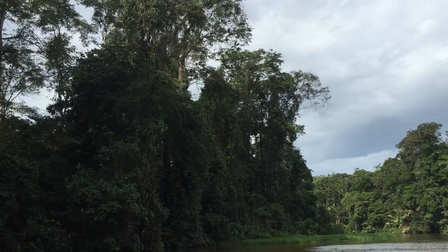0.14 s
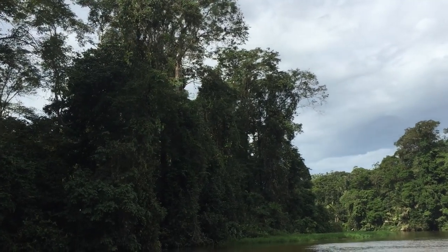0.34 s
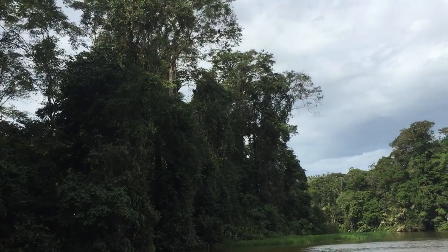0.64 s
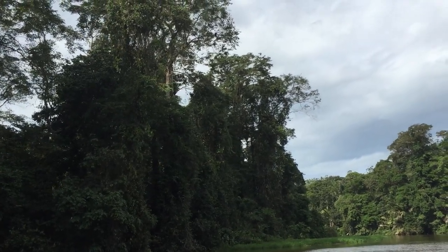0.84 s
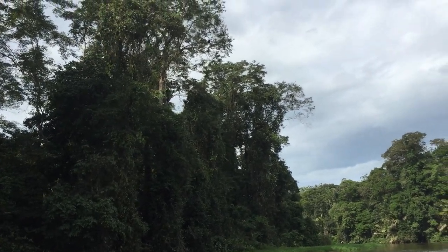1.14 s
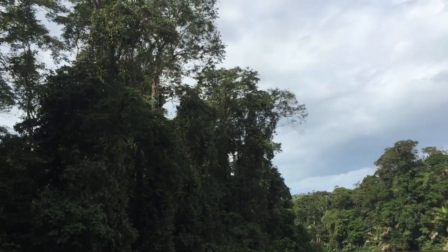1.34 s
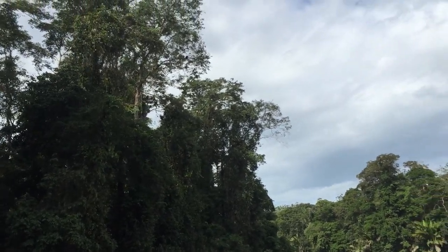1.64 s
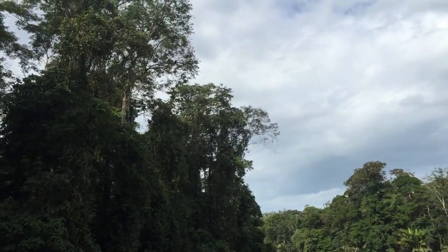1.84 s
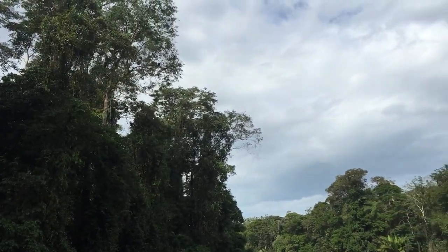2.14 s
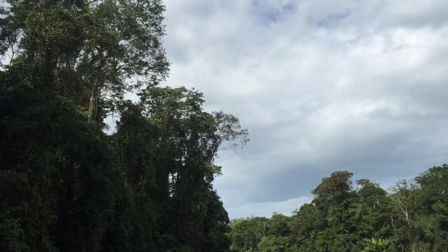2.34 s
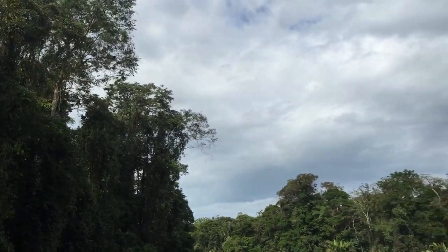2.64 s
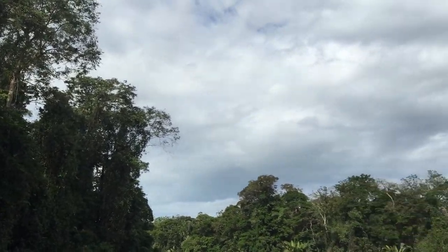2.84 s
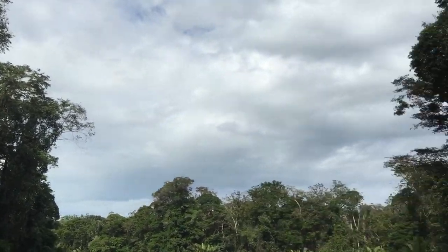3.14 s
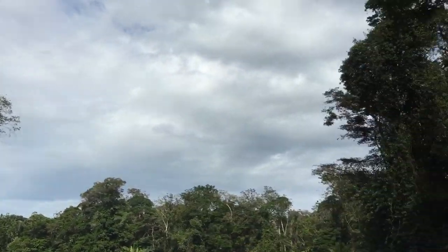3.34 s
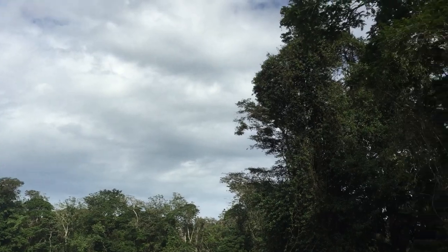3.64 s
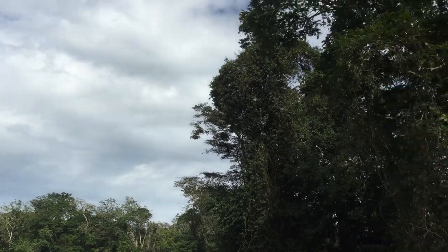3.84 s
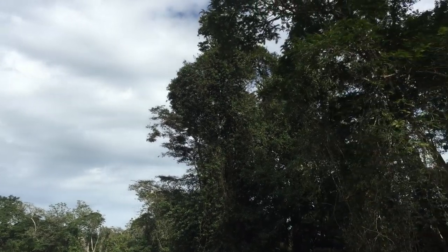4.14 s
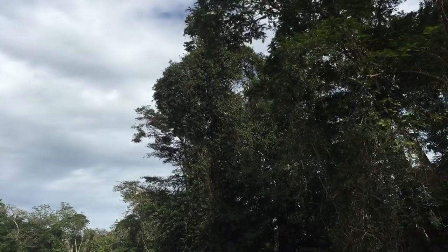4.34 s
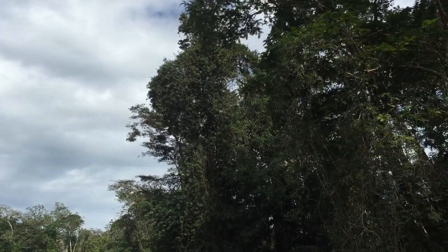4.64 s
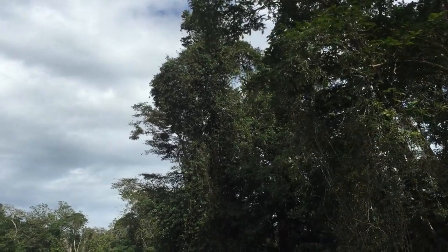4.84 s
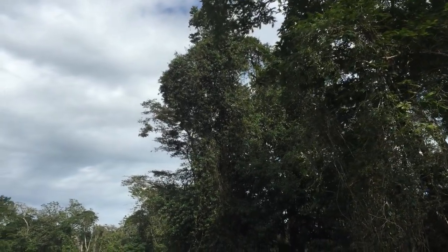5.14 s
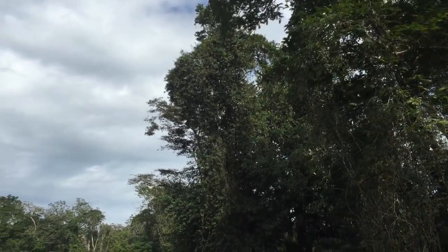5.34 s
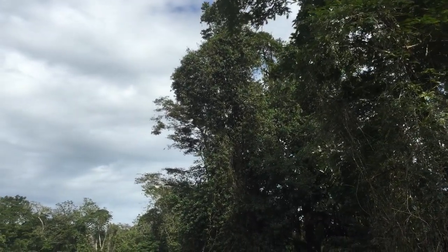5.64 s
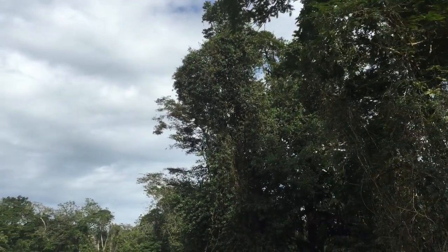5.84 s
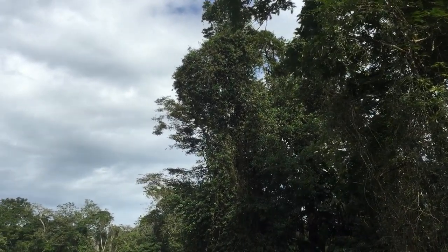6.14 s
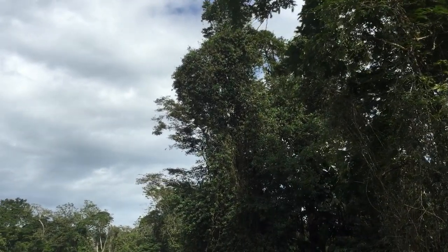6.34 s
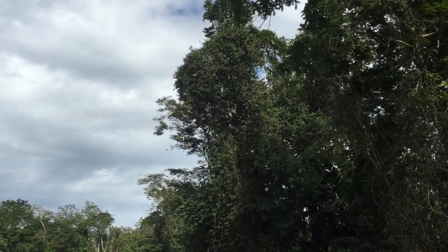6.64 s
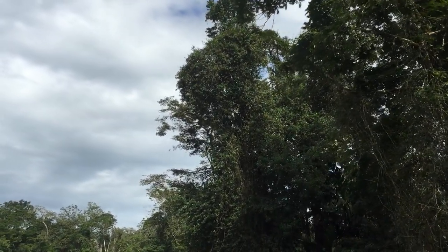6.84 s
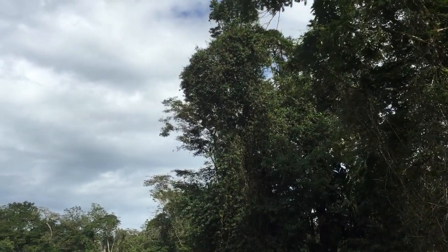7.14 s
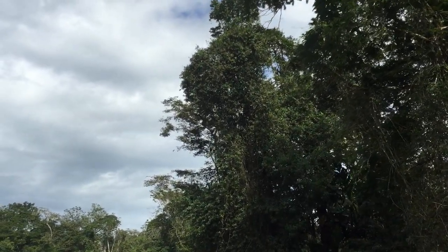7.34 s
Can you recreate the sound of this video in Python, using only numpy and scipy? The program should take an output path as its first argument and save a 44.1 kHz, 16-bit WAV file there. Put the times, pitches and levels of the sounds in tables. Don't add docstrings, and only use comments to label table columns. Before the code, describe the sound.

Unseen howler monkeys roar in throbbing, hollow rasps across a rainforest river while water drips, plastic rattles near the boat and wind thumps the microphone.

```python
import sys
import numpy as np
from scipy import signal
from scipy.fft import rfft, irfft
from scipy.io import wavfile
from scipy.ndimage import uniform_filter1d

SR = 44100
rng = np.random.default_rng(int(sys.argv[2]) if len(sys.argv) > 2 else 0)


def file_out(sig):
    cols = np.atleast_2d(sig).T
    lim = np.clip(cols, -1, 1)
    pcm = np.round(lim * 32767).astype(np.int16)
    wavfile.write(sys.argv[1], SR, pcm)


def invert_db(level):
    return 10 ** (np.asarray(level, dtype=float) / 20)


N = 330705
TIME = np.arange(N) / SR

# (start [s], stretch of a throb [s per s], grain [dB])
ROARS = [
    (0.0, 0.1, 1.5),
    (1.001, 0.033, 1.2),
    (3.502, 0.031, 1.5),
    (6.147, 0.051, 1.9),
]
# (time [s], throat level [dB], throat pitch [Hz])
THROBS = [
    [(0.206, -53, 528), (0.335, -55.5, 518), (0.418, -59, 516), (0.553, -70, 521)],
    [(1.012, -55, 545), (1.105, -52.5, 520), (1.196, -54, 505), (1.282, -51.5, 507), (1.393, -52.5, 505),
     (1.489, -53, 520), (1.582, -51.5, 505), (1.686, -53, 505), (1.784, -52, 510), (1.883, -52, 515),
     (1.978, -50.5, 508), (2.07, -53, 510), (2.166, -52.5, 507), (2.278, -55, 515)],
    [(3.535, -50.5, 559), (3.62, -47.5, 513), (3.698, -49, 517), (3.789, -50.5, 538), (3.9, -48, 571),
     (3.991, -48.5, 557), (4.082, -44, 564), (4.162, -44.5, 539), (4.245, -43.5, 538), (4.352, -44, 553),
     (4.44, -47.5, 551), (4.509, -46, 562), (4.604, -44.5, 561), (4.64, -47.5, 536), (4.725, -45.3, 546),
     (4.818, -48.5, 539), (4.931, -45.5, 526), (5.036, -55, 532), (5.155, -49, 531), (5.23, -52, 558),
     (5.339, -47, 541), (5.429, -49, 542), (5.521, -47, 546), (5.659, -58, 497), (5.78, -61.5, 490)],
    [(6.184, -52, 601), (6.28, -43.5, 575), (6.37, -45.5, 577), (6.451, -44.5, 561), (6.537, -47.5, 542),
     (6.621, -47, 556), (6.709, -47.5, 547), (6.794, -47.5, 573), (6.883, -48, 536), (6.98, -46, 533),
     (7.066, -46, 554), (7.152, -45.5, 544), (7.252, -44, 553), (7.351, -43.5, 546), (7.43, -46, 578)],
]
# (time [s], level [dB], mouth pitch [Hz], mouth opening over throat [dB])
HELD = [
    [(0.0, -53, 760, -35), (0.2, -72, 767, -37), (0.42, -63, 782, -23), (0.6, -56.5, 753, -14),
     (0.63, -89, 750, -29)],
    [(1.3, -90, 748, -7), (1.4, -120, 755.8, -12.5), (1.9, -61, 748, -13), (2.3, -75, 762, -17),
     (2.36, -93, 778, -12)],
    [(3.55, -99, 869, -16.5), (4.0, -67, 876, -3), (4.18, -71, 878, -12), (4.4, -64, 876, -4.5),
     (4.8, -50, 859.4, -8.5), (5.1, -47.5, 853, -7), (5.58, -48, 838.4, -7.5), (5.63, -54.5, 846, -7.5),
     (5.8, -81, 838, -2.5)],
    [(6.2, -67, 840, -12.5), (6.4, -57.5, 805, -11.5), (6.7, -54, 811.5, -6), (6.9, -49, 829, -7.5),
     (7.2, -59, 819, -7), (7.5, -46, 862, -9.5)],
]
# (time [s], level [dB])
RIPPLE = [
    (0, -63.5),
    (.2, -75.5),
    (1.0, -69.5),
    (1.3, -69.5),
    (2.0, -73),
    (2.4, -75.5),
    (3.0, -73),
    (3.4, -75),
    (4.3, -74.5),
    (7.5, -76),
]
LONGEST_THROB_S = 0.12


def rms_one(x):
    return x / np.sqrt(np.mean(np.abs(x) ** 2) + 1e-20)


def in_time(rows):
    s, *columns = np.transpose(rows)
    return [np.interp(TIME, s, c) for c in columns]


def inside(rows):
    from_start = TIME - rows[0][0] + 0.038
    to_end = rows[-1][0] - TIME
    return np.clip(np.minimum(from_start, to_end) / 0.0042, 0, 1)


def smooth(x, hz):
    r = np.exp(-2 * np.pi * hz / SR)
    return signal.lfilter([(1 - r) ** 2], [1, -2 * r, r * r], x)


def drift(hz):
    return rms_one(smooth(rng.standard_normal(N + SR), hz)[SR:])


def coloured(points):
    hz, db = np.transpose(points)
    bins = np.maximum(np.arange(N // 2 + 1) * SR / N, 1)
    gain = invert_db(np.interp(np.log(bins), np.log(hz), db, left=-90, right=-90))
    return rms_one(irfft(rfft(rng.standard_normal(N)) * gain, N))


def rasp(hz, width_hz, wander):
    z = drift(width_hz * 1.22) + 1j * drift(width_hz * 0.8)
    z = z * (np.abs(z) + 0.39) ** (wander - 1)
    z = smooth(smooth(z, width_hz * 5.8), width_hz * 5.8)
    carrier = np.exp(2j * np.pi * np.cumsum(hz + 0 * TIME) / SR)
    return np.sqrt(2) * np.real(rms_one(z) * carrier)


def ring(clicks, hz, t60):
    r = invert_db(-60 / (t60 * SR))
    w = 2 * np.pi * hz / SR
    return signal.lfilter([0, np.sin(w)], [1, -2 * r * np.cos(w), r * r], clicks + 1e-18)


def breath():
    first_throb_s = 0.02
    catch_depth, catch_lead_s, catch_s = 0.72, 0.017, 0.011
    closes_at_s, closing_s = 1.77, 0.79
    power = sum(invert_db(2 * in_time(call)[0]) * inside(call) for call in HELD)
    for (start, stretch, _), throbs in zip(ROARS, THROBS):
        for s, db, _ in throbs:
            length = min(first_throb_s + stretch * (s - start), LONGEST_THROB_S)
            rise = np.clip((TIME - s + 0.0052) / 0.0092, 0, 1) ** 2
            fall = np.exp(-np.maximum(TIME - s - 0.62 * length, 0) ** 2 / 0.016 ** 2)
            separate = np.clip((start + closes_at_s - s) / closing_s, 0, 1)
            choke = np.exp(-((TIME - s + catch_lead_s) / catch_s) ** 2)
            power = power * (1 - catch_depth * separate * choke) + invert_db(2 * db) * rise * fall
    return power


def roar():
    # (whistle pitch [Hz], its downward slide [Hz per s], whistle level [dB],
    # level of the throat's twin [dB], nose level [dB], whistle fade [dB per s]), levels re throat
    head = [
        (3820, 1.25, -34, -10, -43, 2),
        (3900, 1.43, -30, -4, -44, 2),
        (3920, 66, -28, -11.5, -31.5, 5.5),
        (3880, 160, -21.5, -8.5, -36, 9),
    ]
    # (frequency [Hz], width [Hz], level re throat or mouth [dB])
    with_throat = [(472, 70, -15.5)]
    with_mouth = [(1003, 55, -18), (730, 14, -37)]
    nose = [(1570, 33, -5.5), (4500, 130, -7)]
    power = breath()
    which = np.maximum(np.searchsorted(np.array(ROARS)[:, 0], TIME) - 1, 0)
    start, _, grain_db = np.array(ROARS)[which].T
    whistle_hz, slide, whistle_db, twin_db, nose_db, fade_db = np.array(head)[which].T
    age = TIME - start

    onsets, _, throb_hz = np.concatenate(THROBS).T
    last = np.maximum(np.searchsorted(onsets, TIME + 0.0101) - 1, 0)
    since = np.clip(TIME - onsets[last], 0, LONGEST_THROB_S / 2)
    throat_hz = throb_hz[last] - 170 * (since - .025)
    throat_hz += 3.957 * drift(4.99)
    throat = rasp(throat_hz, 27, wander=.3)
    throat += invert_db(twin_db) * rasp(615, 24.6, wander=0.95)
    for hz, width, db in with_throat:
        throat += invert_db(db) * rasp(hz, width, wander=0.29)
    for hz, width, db in nose:
        throat += invert_db(db + nose_db + 3.7 * drift(24.0)) * rasp(hz, width, wander=0.48)

    _, mouth_hz, mouth_db = in_time(sum(HELD, []))
    mouth = rasp(mouth_hz, 57, wander=.45)
    for hz, width, db in with_mouth:
        mouth += invert_db(db) * rasp(hz, width, wander=0.34)

    whistle = rasp(whistle_hz - slide * age, 110, wander=0.86)
    whistle *= invert_db(whistle_db - fade_db * age + 2.1 * drift(5.8))
    late = np.interp(TIME - .012, TIME, power) * np.clip(age / 0.11 - .6, 0, 1)
    grain = rms_one(invert_db(grain_db * drift(60)))
    voice = np.sqrt(power) * grain * (throat + invert_db(mouth_db) * mouth)
    return voice + np.sqrt(np.minimum(late, power)) * whistle


def far_roar():
    # (time [s], pitch [Hz], level [dB])
    last_breath = [
        (0, 693, -47),
        (.1, 700, -58.5),
        (.2, 700, -59.5),
        (.3, 730, -66),
        (.4, 737, -69.5),
        (.6, 733, -71),
        (.64, 754, -78),
    ]
    hz, db = in_time(last_breath)
    return inside(last_breath) * invert_db(db) * rasp(hz, 48.0, wander=0.73)


def forest(x):
    t = TIME[:2 * SR]
    trunks, bank = invert_db(-60 * t / 1.34), invert_db(6.5 - 60 * t / 0.84)
    tail = rng.standard_normal(2 * SR) * (trunks + bank) * (t > .015) * (1 - np.exp(-t / 0.044))
    return invert_db(-12.5) * signal.fftconvolve(x, tail / np.sqrt(np.sum(tail ** 2)))[:N]


def wind():
    # (time [s], level [dB])
    gusts = [(0.0, -54.5), (0.45, -53.5), (1.2, -50.5), (1.38, -62.5), (1.52, -53), (2.2, -54), (3.3, -56),
             (4.3, -55), (4.92, -53), (5.0, -47.5), (5.15, -55), (5.76, -48.5), (5.84, -55.5),
             (5.97, -41.5), (6.16, -47.5), (6.6, -44.5), (6.78, -42.5), (7.5, -45.5)]
    # (frequency [Hz], density [dB per Hz])
    wind_colour = [(12, -74), (20, -17.5), (48, -0.5), (81, -2), (150, 0.5), (211, -7.5), (300, -14.5),
                   (390, -17), (660, -120)]
    rush_colour = [(150, -1.5), (260, -7.5), (400, -12.5), (700, -16), (1100, -21.5), (1600, -57)]
    # (time [s], peak [dB], frequency [Hz], length [cycles])
    slaps = [(0.377, -35.5, 61.4, 1.2), (0.655, -42.5, 74, 1.5), (1.181, -42, 89, 1.8),
             (1.221, -41, 200, 1.5), (1.512, -44.5, 68, 1.6), (2.589, -41.5, 98.5, 1.9),
             (2.936, -39.5, 109, 1.14), (3.67, -46, 95, 0.87), (4.101, -45, 78.6, 1.3),
             (4.994, -37, 64.2, 0.72), (5.771, -34.5, 69.9, 0.98), (5.931, -31.5, 66.9, 1.75),
             (6.011, -35.5, 69.96, 2.4), (6.249, -45, 97.3, 4.2), (6.378, -22, 83.2, 1.12),
             (6.462, -26, 83.2, 0.78), (6.66, -18.5, 108.5, 1), (6.768, -26.5, 138, 1.2),
             (6.867, -25.5, 112.7, 0.62), (6.974, -25, 78.9, 0.96), (7.11, -37, 108.9, 1.3),
             (7.219, -30.5, 78.4, 1.1), (7.4, -36, 190.3, 1.38), (7.442, -22, 96.2, 0.8)]
    turbulence = coloured(wind_colour) * invert_db(3.5 * drift(12.0))
    out = coloured(rush_colour) * invert_db(-69.5 + 0.1 * (in_time(RIPPLE)[0] + 73.5))
    gust_db = in_time(gusts)[0] + 53
    deep_db, flutter_db = -58 + 1.78 * gust_db, -59 + 0.45 * gust_db
    for side, db in (("low", deep_db), ("high", flutter_db)):
        part = signal.sosfiltfilt(signal.butter(2, 90, side, fs=SR, output="sos"), turbulence)
        out += invert_db(db) * part / np.sqrt(uniform_filter1d(part ** 2, SR // 4))
    for s, db, hz, cycles in slaps:
        t = TIME - s
        out += invert_db(db) * np.exp(-(t * hz * 2 / cycles) ** 2) * np.cos(2 * np.pi * hz * t - .8)
    return signal.sosfilt(signal.butter(2, 42, "high", fs=SR, output="sos"), out)


def river():
    # (frequency [Hz], density [dB per Hz])
    ripple_colour = [(530, -33), (900, -21), (967, -17), (1050, -0.5), (1190, 0.5), (1400, 2.5), (2630, 4),
                     (2890, 4.5), (3880, -1.5), (4730, -10.5), (6000, -8.5), (7800, -19), (13200, -120)]
    wash = coloured(ripple_colour) * invert_db(1.74 * drift(35.0) + 0.11 * drift(49.0))
    born = (rng.random(N) < 120 / SR) * rng.standard_normal(N)
    dealt = rng.integers(0, 12, N)
    pitches = enumerate(np.geomspace(1300, 4500, 12))
    bubbles = sum(ring(born * (dealt == k), hz, 41.0 / hz) for k, hz in pitches)
    return invert_db(in_time(RIPPLE)[0]) * (wash + invert_db(-12.5) * rms_one(bubbles))


def fitting():
    # (time [s], peak [dB], hollow [dB], snap [dB])
    knocks = [(0.04, -21, 2.5, -32), (0.1012, -41.5, 19, 3), (0.104, -32.5, 13.5, -6), (0.109, -46, 11, -2),
              (1.09, -17.5, -7.5, -31), (1.095, -31, -17, -24), (1.1028, -41, -20, -24),
              (1.106, -38, -22, -24), (1.1092, -24, -21, -20), (1.1133, -26, -3, -12),
              (1.121, -48, -15, -24), (1.148, -45, -20, -8), (1.1605, -43, -20, -6), (1.175, -42, -20, -12),
              (1.1927, -42, -20, -4), (1.197, -48, -20, -11), (1.2187, -27.5, 0, -28),
              (1.2258, -30, -27, -26), (1.2315, -40, -20, -8), (1.241, -30, -27, -30),
              (1.2465, -28, 4, -24), (1.252, -11.5, -3.5, -30), (1.2595, -46, 1, -20),
              (1.2639, -29, 7.5, -30)]
    # (start [s], length [s], level [dB])
    rubs = [
        (0.0, 0.021, -67),
        (0.12, 0.054, -81),
        (1.085, 0.045, -58.5),
        (1.146, 0.065, -67.5),
        (1.216, 0.053, -60),
        (1.27, 0.027, -70),
    ]
    # (frequency [Hz], level [dB], time to fall 60 dB [s])
    shell = [(1780, -6, 0.0067), (2130, -1, 0.0029), (2790, 3, 0.0087), (3150, 4.5, 0.0037),
             (4070, 1.5, 0.0054), (5700, -9.5, 0.0058), (6270, -5.5, 0.0014)]
    hollow = [(580, -11, 0.017), (760, -10, 0.03), (1140, -4, 0.011)]
    s, db, hollow_db, snap_db = np.transpose(knocks)
    at = np.round(s * SR).astype(int)
    chance = rng.normal(0, 1, (len(s), len(shell + hollow)))
    rub = sum(invert_db(level_db) * (TIME > t0) * (TIME < t0 + length) for t0, length, level_db in rubs)
    out = np.zeros(N)
    for k, (hz, mode_db, t60) in enumerate(shell + hollow):
        grains = (rng.random(N) < 500 / SR) * rng.standard_normal(N)
        clicks = rub * grains * invert_db(0.98 * rng.standard_normal(N))
        clicks[at] += invert_db(db - 15 + chance[:, k] + (hollow_db if k >= len(shell) else 0))
        out += invert_db(mode_db) * ring(clicks, hz, t60) * (-1) ** k
    snap = rng.standard_normal((len(s), 40)) * np.hanning(40)
    out[at[:, None] + np.arange(40) - 10] += invert_db(db + snap_db - 11.5)[:, None] * np.diff(snap, prepend=0)
    dull = signal.sosfilt(signal.butter(3, 6000, fs=SR, output="sos"), out)
    return dull + invert_db(1.0) * smooth(out, 11400)


def splashes():
    # (start [s], length [s], frequency [Hz], level [dB])
    gurgles = [(0.002, .02, 990, -57), (.113, .02, 1260, -64), (.134, .015, 2020, -68),
               (.151, .03, 1150, -68), (0.344, 0.06, 1180, -63), (.353, .045, 2850, -68),
               (.357, .045, 3700, -70), (.364, .025, 2130, -68), (.368, .02, 4250, -71),
               (.391, .012, 3100, -65), (0.456, 0.034, 1214, -70), (.479, .02, 2000, -69),
               (0.617, .015, 1150, -69), (1.112, .008, 740, -51), (1.797, 0.022, 2820, -68),
               (2.944, .004, 2150, -61), (2.966, 0.0058, 2130, -53), (3.918, 0.0053, 2410, -55.5),
               (4.118, 0.012, 2400, -66), (5.771, 0.066, 996, -61)]
    broad = [
        (.101, 0.01, 347, -42.5),
        (.122, .035, 393, -50.5),
        (0.6, 0.054, 1850, -68.5),
        (1.24, 0.014, 2000, -41.5),
        (1.706, 0.038, 2130, -65),
        (1.778, 0.0082, 1610, -57),
        (1.907, 0.016, 2695, -60.5),
        (2.014, 0.0038, 2150, -64),
        (4.142, 0.037, 1120, -62),
        (4.166, 0.024, 1526, -56),
    ]
    risers = [
        (1.161, 0.0086, 1060, -55),
        (6.04, 0.055, 1380, -63),
    ]
    kinds = ((gurgles, 0.092, 0.006, .1), (broad, 0.36, 0.0057, .1), (risers, .04, .26, 8))
    out = np.zeros(N)
    for rows, width, climb, fade_db in kinds:
        for s, length, hz, db in rows:
            t = TIME[:round((length + .01) * SR)]
            noise = rng.standard_normal(SR // 8) + 1j * rng.standard_normal(SR // 8)
            cluster = smooth(smooth(noise, width * hz), width * hz)[-len(t):]
            pitch = hz * (1 + climb * np.minimum(t / length, 1) ** 3)
            glide = np.exp(2j * np.pi * np.cumsum(pitch) / SR)
            shape = np.clip(np.minimum(t / 0.00098, (t[-1] - t) / 0.012), 0, 1)
            shape = shape * invert_db(-fade_db * t / length)
            out[round(s * SR):][:len(t)] += invert_db(db + 1.5) * shape * np.real(rms_one(cluster) * glide)
    return out


def drips():
    # (time [s], peak [dB], ring [Hz], time to fall 60 dB [s], bend [share of pitch])
    trapped = [(0.8974, -47.5, 1750, 0.03, -0.0088), (1.0114, -46, 2360, 0.017, 0.027),
               (3.1094, -34, 2060, 0.019, -0.062), (3.92, -48.5, 2752, 0.033, -0.019),
               (4.308, -44.5, 1764, 0.031, -0.015), (4.6358, -48, 4067, 0.042, 0.05),
               (4.8349, -43.5, 2040, 0.034, 0.05), (5.5827, -57, 3750, 0.093, -0.024),
               (6.0807, -43.5, 2444, 0.03, -0.071), (6.237, -40.5, 2114, 0.026, -0.073),
               (6.372, -41.5, 2094, 0.025, -0.11), (6.4466, -45, 1735, 0.048, 0.074),
               (6.507, -36, 1855, 0.023, -0.13), (6.514, -51, 1684, 0.066, 0.052),
               (7.1103, -45.5, 1160, 0.047, -0.16)]
    # (time [s], peak [dB], ring [Hz], spray over the ring [dB])
    ticks = [(0.4535, -47.5, 4600, -26), (0.5367, -58, 2700, -22), (0.8626, -51, 4250, -21),
             (1.061, -52, 2875, -27), (1.4246, -49.5, 3560, -23), (2.059, -52.5, 3000, -19),
             (3.619, -48, 2550, -27), (3.7886, -48, 3740, -16), (3.738, -58.5, 6800, -20),
             (3.916, -57, 6360, -15), (4.454, -53, 3910, -26), (4.87, -45.5, 2650, -27),
             (5.13, -53.5, 4400, -18), (5.2122, -43, 2853, -17.5), (5.26, -47.5, 4080, -29),
             (5.717, -52, 3242, -19), (5.7585, -52.5, 2583, -28), (6.118, -48, 3400, -19)]
    # (time [s], peak [dB], ring [Hz])
    bursts = [(1.1457, -44, 2760), (1.146, -54, 3700), (1.1583, -42, 2950), (1.174, -58, 3000),
              (1.1782, -40, 1430), (1.182, -45, 2330), (1.1825, -49, 3970), (1.187, -43, 1400),
              (1.1905, -47, 4200), (1.196, -42, 4550), (1.197, -46, 3900), (1.1975, -48, 5530),
              (1.198, -59, 6660), (1.205, -52, 2420), (1.223, -52, 1920), (1.231, -45, 4000),
              (1.2376, -38, 1880), (1.243, -44, 2720), (1.248, -29, 1610), (1.255, -39, 3900),
              (1.287, -55, 4200), (2.943, -50, 3150), (2.966, -39.5, 2700), (2.984, -45, 2850),
              (3.045, -54, 2870), (3.2346, -55, 2860)]
    out, t = np.zeros(N + SR), TIME[:SR // 8]
    drops = [(s, db, hz, t60, -36, .6, bend) for s, db, hz, t60, bend in trapped]
    drops += [(s, db, hz, .014, spray_db, .6, -.02) for s, db, hz, spray_db in ticks]
    drops += [(s, db + 1.5, hz, .011, -60, 0, .02) for s, db, hz in bursts]
    fizz = smooth(np.diff(rng.standard_normal(len(t) + 2), 2), 5000)
    fizz = 3.6 * fizz * np.exp(-t / 0.0027)
    chances = rng.uniform(0, 1, (len(drops), 2))
    for (s, db, hz, t60, spray_db, hard, bend), (above, beside) in zip(drops, chances):
        sinking = t + 0.00022 * hard * (1 - np.exp(-t / 0.0003)) + bend * t ** 2 / t60
        bubble = np.sin(2 * np.pi * hz * sinking)
        bubble += 0.04 * np.sin(2 * np.pi * hz * (.95 - 0.11 * beside) * sinking)
        bubble *= invert_db(-60 * t / t60) * (1 - np.exp(-t * (1 + 2.3 * hard) / 0.00044))
        impact = np.sin(2 * np.pi * (1.6 + 0.89 * above) * hz * t) * t / 0.00049 * np.exp(-t / 0.00072)
        out[round(s * SR):][:len(t)] += invert_db(db) * (bubble + 0.35 * hard * impact + invert_db(spray_db) * fizz)
    hull = rng.standard_normal(len(t)) * np.exp(-t / 0.023) * (t > .003)
    hull /= np.sqrt(np.sum(hull ** 2))
    return out[:N] + invert_db(-15) * signal.fftconvolve(out, hull)[:N]


def hoot():
    # (time [s], pitch [Hz], level [dB])
    call = [
        (2.299, 495.4, -62),
        (2.48, 500, -54),
        (2.6, 497, -59),
        (2.64, 490, -58),
        (2.703, 508, -52.5),
        (2.95, 515.4, -47),
        (3.0, 503.6, -51),
        (3.03, 513, -47),
        (3.13, 522, -47.5),
        (3.161, 550, -46.5),
    ]
    octave_db, third_db, half_line_db = -22.5, -30, -67.5
    hz, level_db = in_time(call)
    locked = np.clip(np.minimum(TIME - call[0][0], call[-1][0] - TIME) / 0.068, 0, 1)
    bright_db = level_db - 32 * (1 - locked)
    quarter_db = -89 + 27.5 * np.clip((TIME - 2.85) / 0.11, 0, 1)
    hz = hz * (1 + 0.00507 * drift(25.2))
    phase = 2 * np.pi * np.cumsum(hz) / SR
    clear = [(1, level_db), (2, bright_db + octave_db),
             (3, bright_db + third_db + .6 * np.minimum(level_db + 51, 0))]
    broken = [(1.5, half_line_db), (1.25, quarter_db), (1.75, quarter_db - 10.0), (0.65, quarter_db - 13),
              (1, level_db - 11), (2, bright_db + octave_db - 4), (7.5, bright_db + third_db - 1)]
    out = sum(invert_db(db + 3 + 1.6 * drift(22.0)) * np.sin(k * phase) for k, db in clear)
    bead_hz = 16.0 + 3.1 * np.sin(9.0 * TIME)
    beads = np.sin(2 * np.pi * np.cumsum(bead_hz) / SR)
    out += sum(invert_db(db - 2.5 + 4 * beads) * rasp(k * hz, 15.0, wander=1) for k, db in broken)
    return inside(call) * out


def scene():
    roars = roar() + far_roar()
    clear = hoot()
    voices = roars + clear + forest(roars + invert_db(-1.5) * clear)
    boat = wind() + river() + fitting() + splashes() + drips()
    return (voices + boat)[None]


def band_limit(x):
    return signal.sosfilt(signal.butter(12, 15300, fs=SR, output="sos"), x)


def record(dry):
    # (frequency [Hz], density [dB per Hz])
    hiss_colour = [(2350, -52), (4000, 0), (4850, -7.5), (9900, -10), (10450, -17), (11000, -11.5),
                   (14600, -13), (15400, -14)]
    close = signal.sosfilt(signal.cheby2(10, 60, 15600, fs=SR, output="sos"), dry)
    mix = close + invert_db(-79) * coloured(hiss_colour)
    return band_limit(mix)


dry = scene()
out = record(dry)
file_out(out)
```